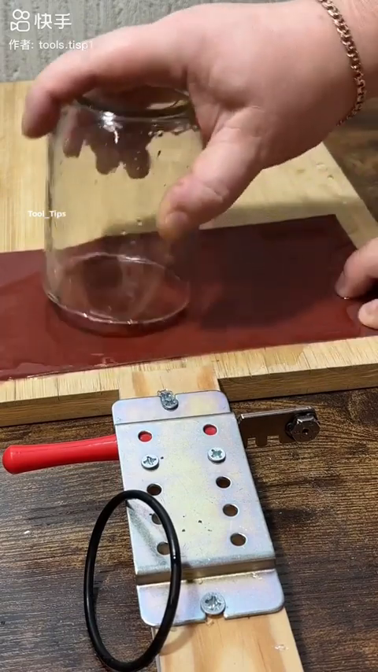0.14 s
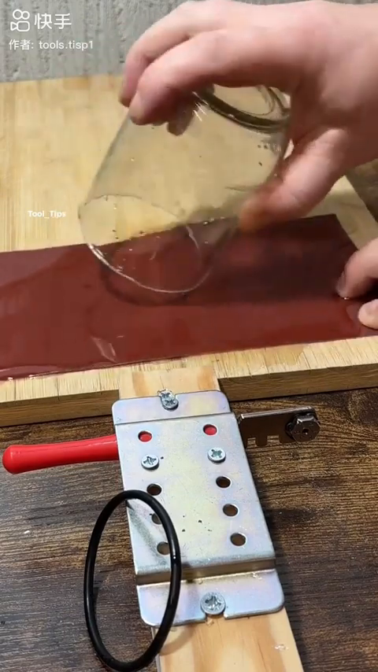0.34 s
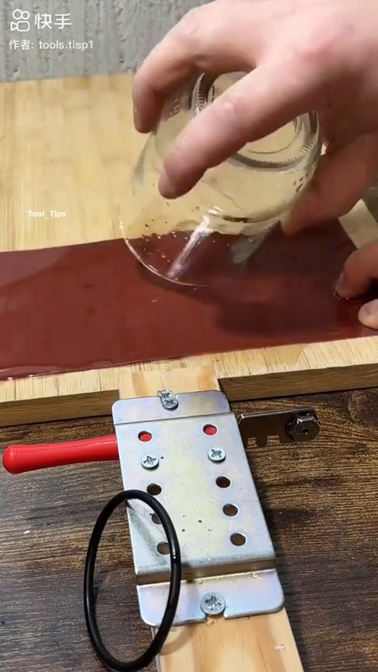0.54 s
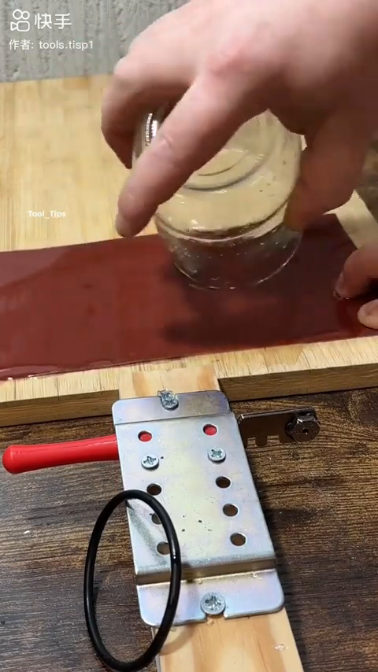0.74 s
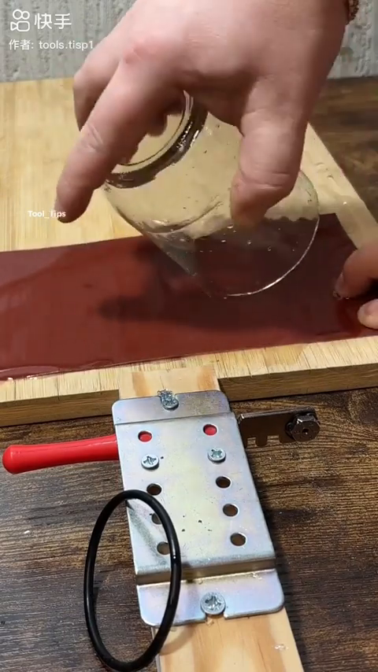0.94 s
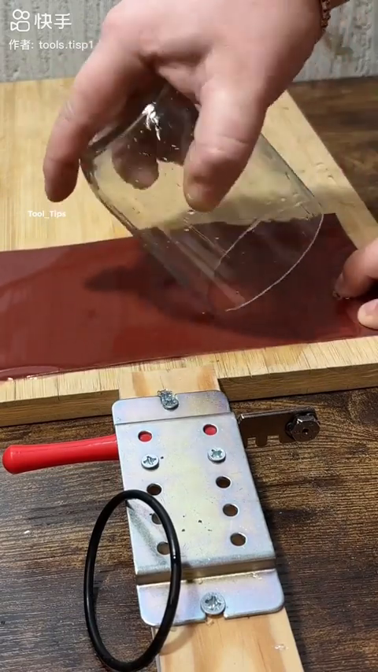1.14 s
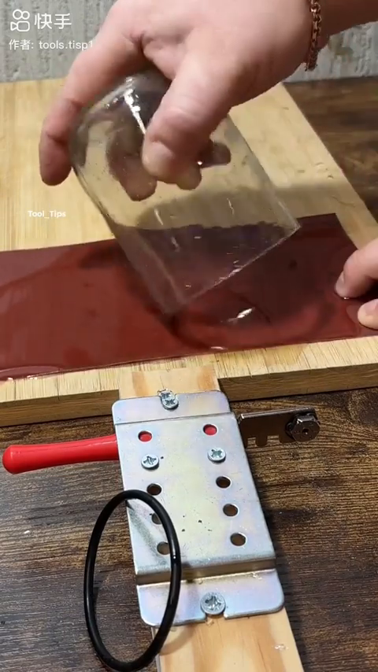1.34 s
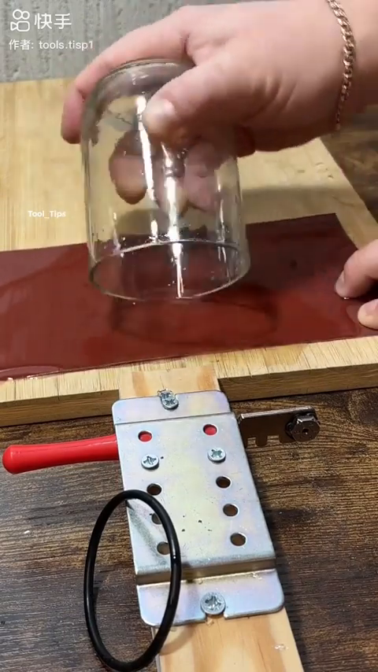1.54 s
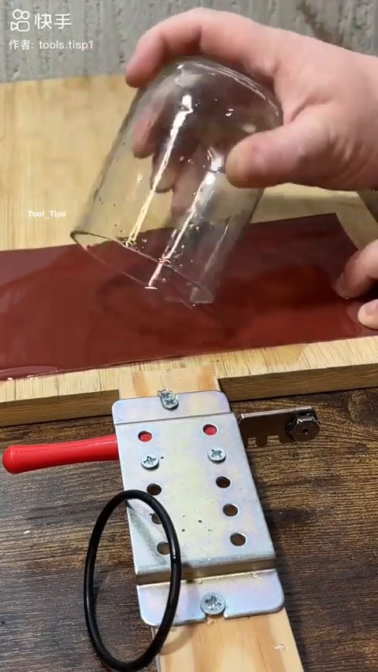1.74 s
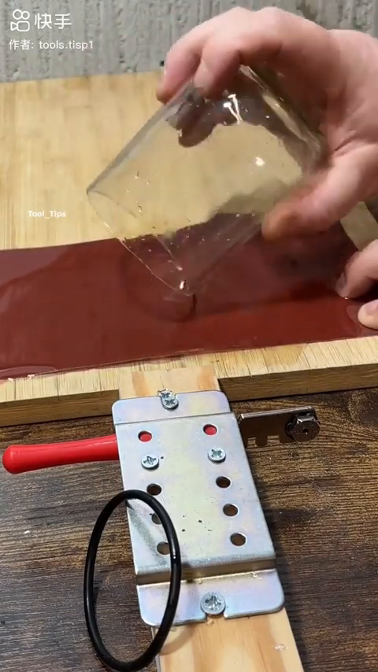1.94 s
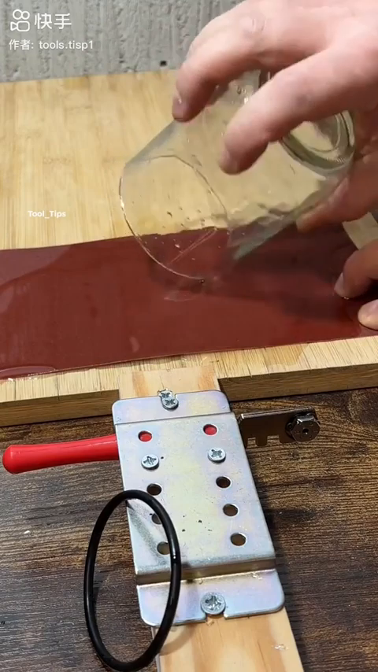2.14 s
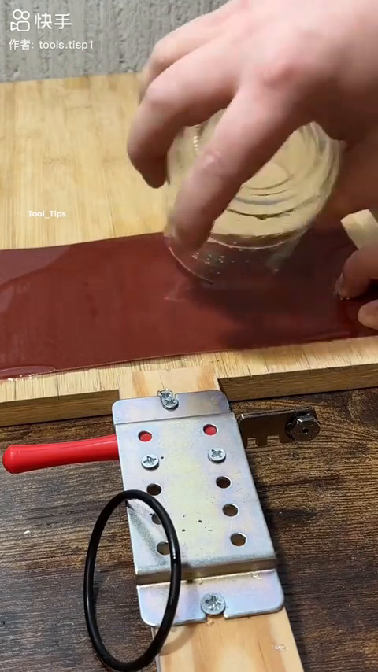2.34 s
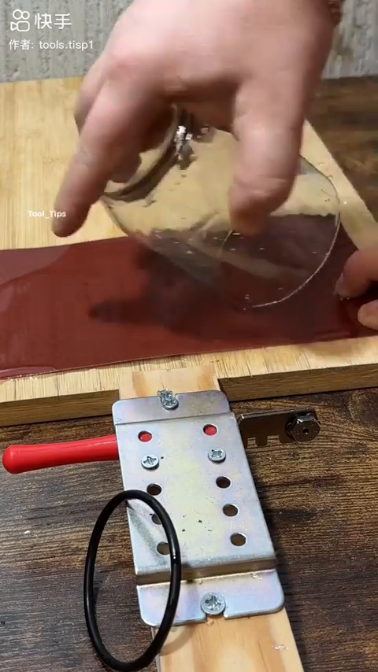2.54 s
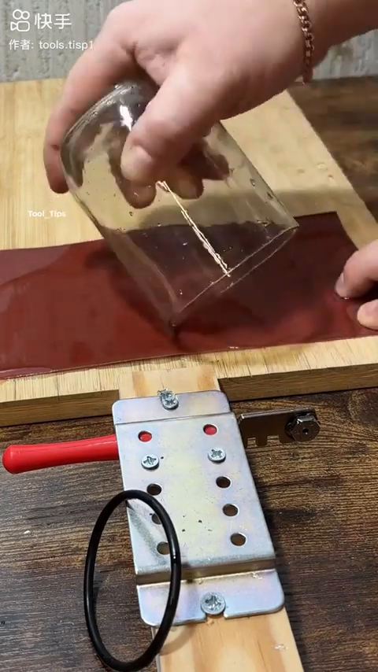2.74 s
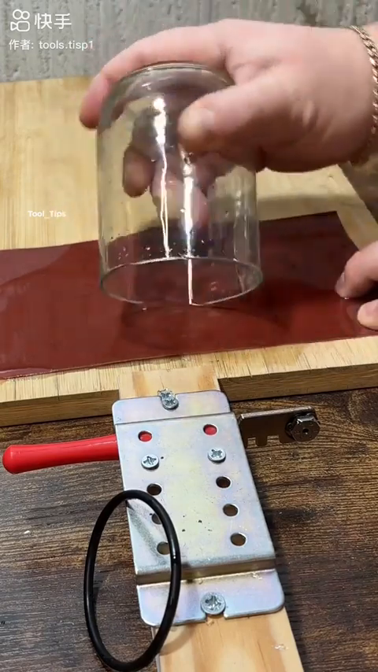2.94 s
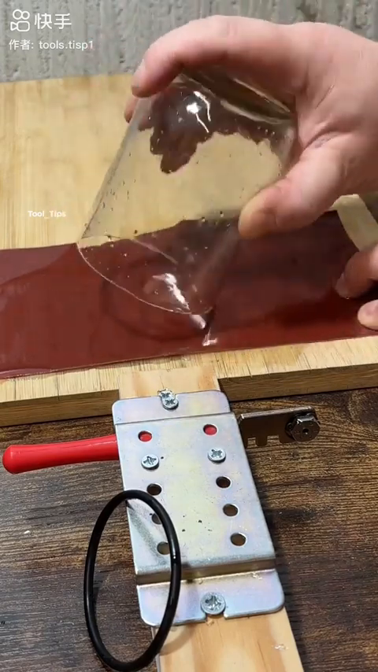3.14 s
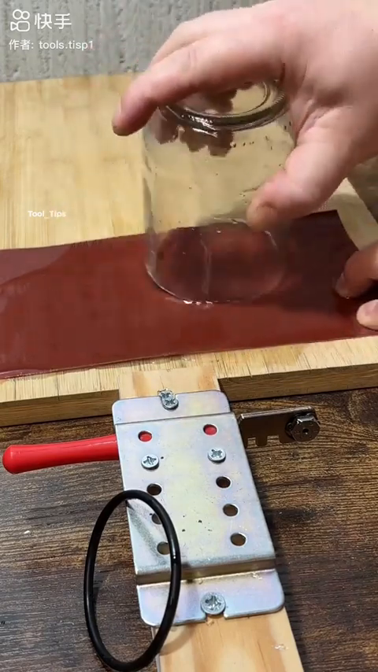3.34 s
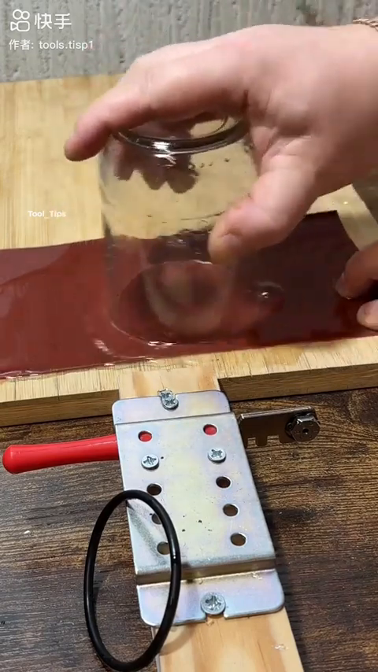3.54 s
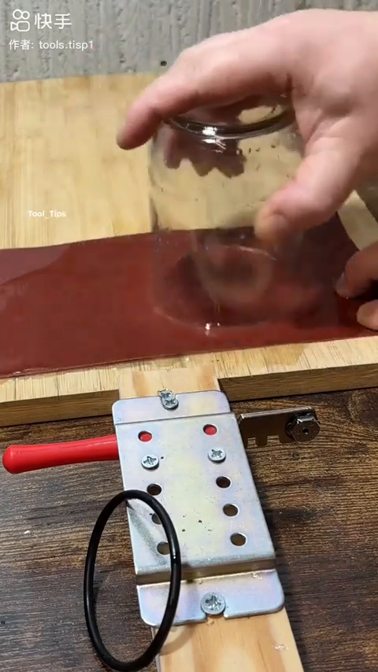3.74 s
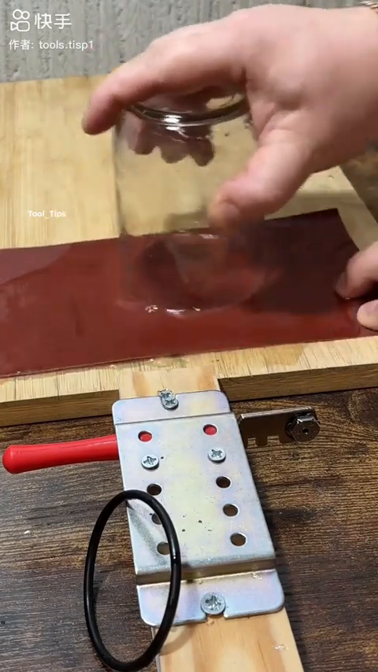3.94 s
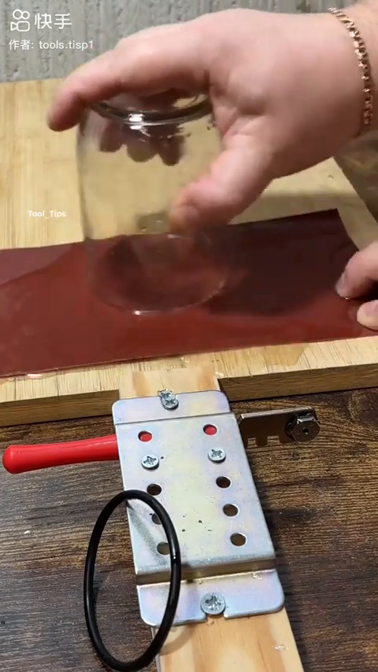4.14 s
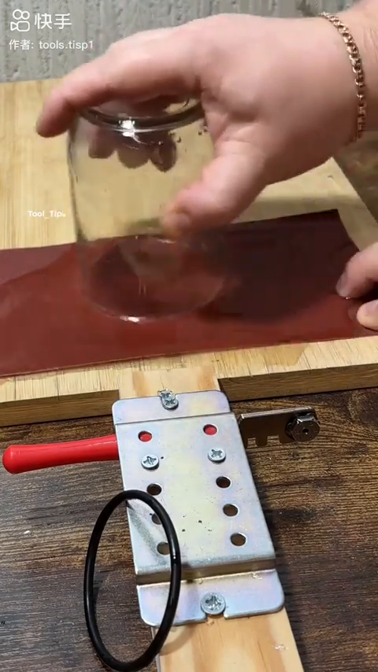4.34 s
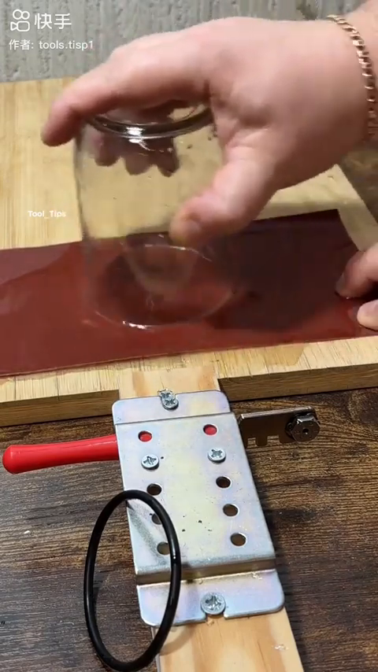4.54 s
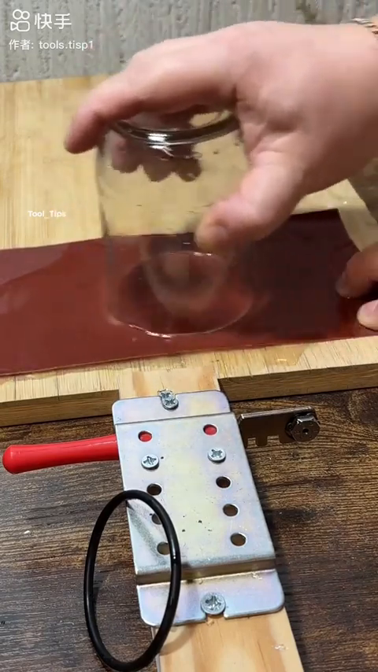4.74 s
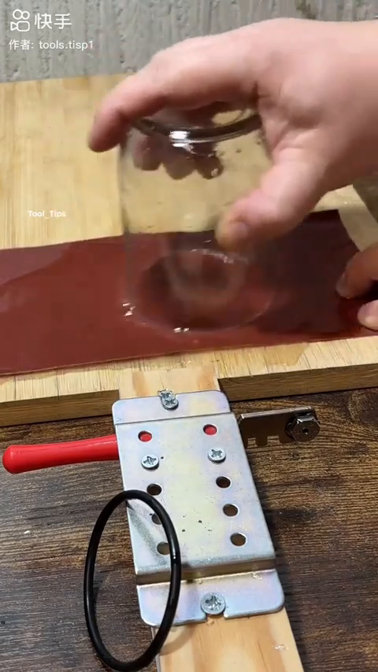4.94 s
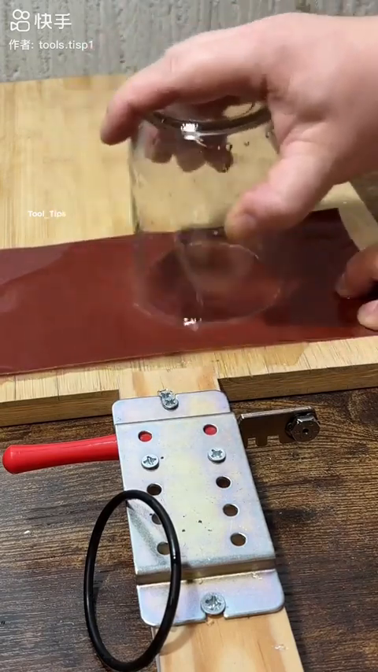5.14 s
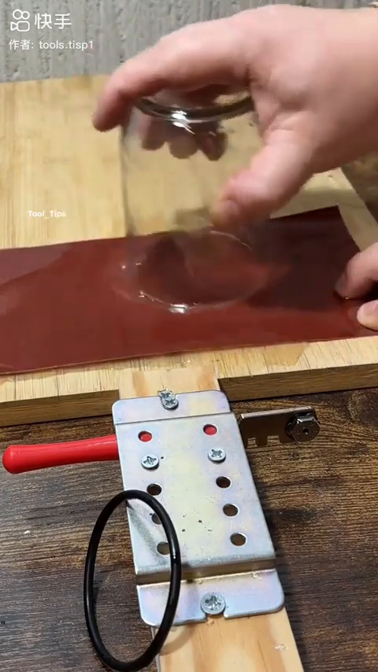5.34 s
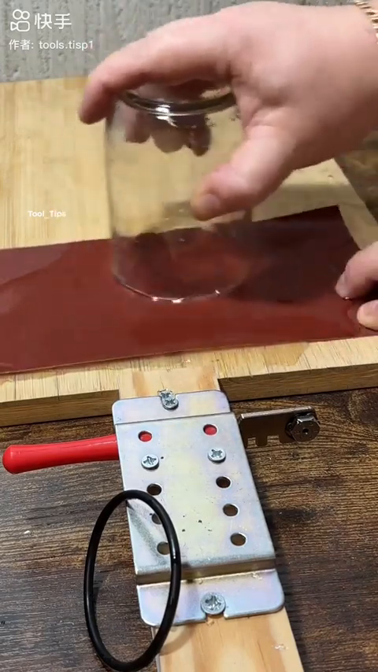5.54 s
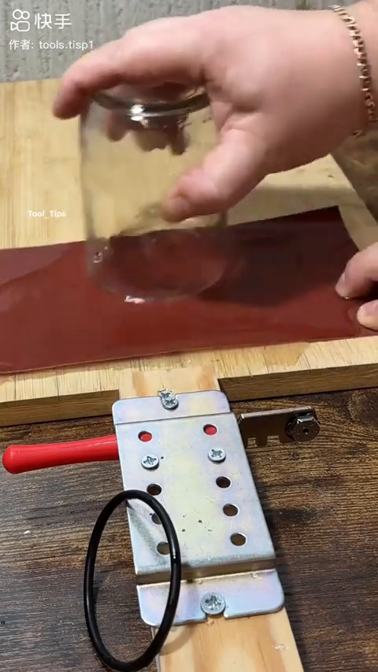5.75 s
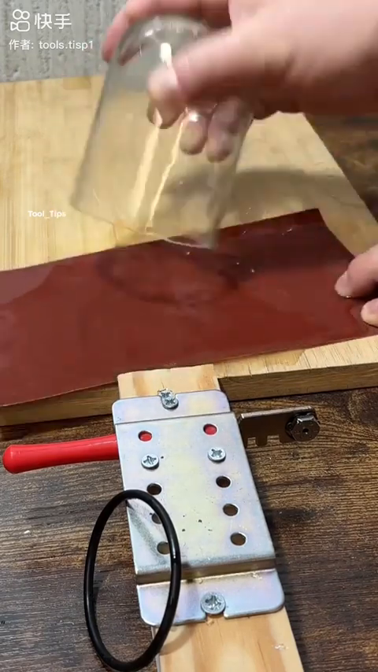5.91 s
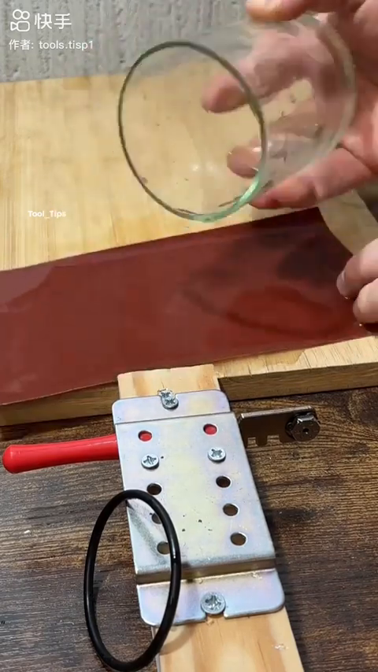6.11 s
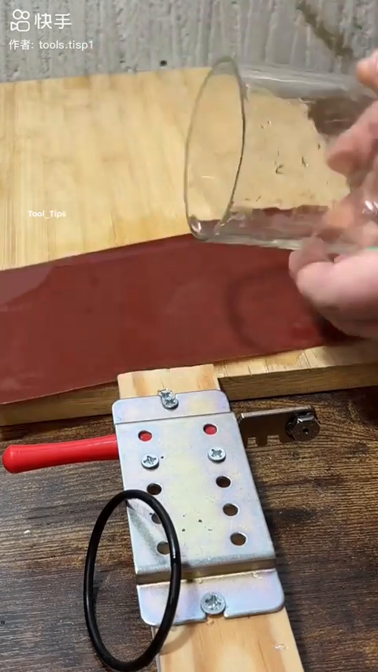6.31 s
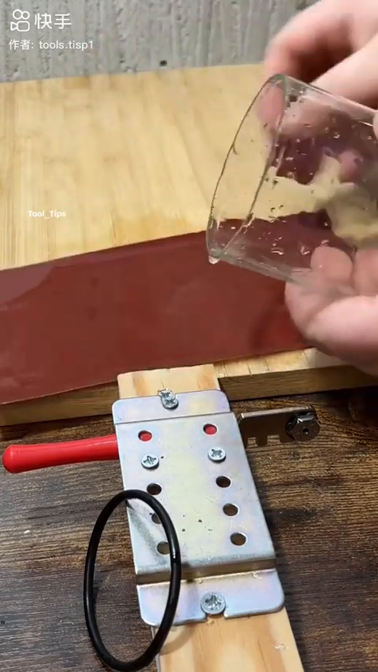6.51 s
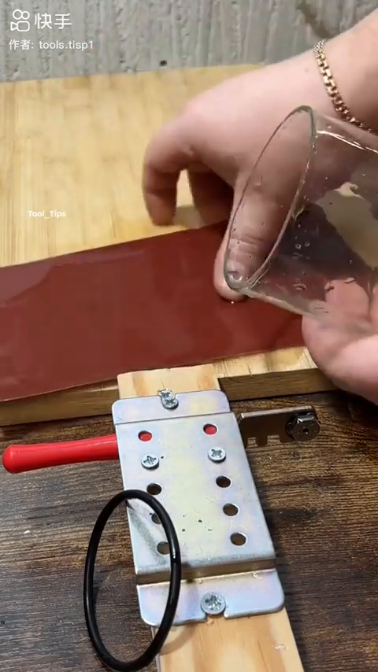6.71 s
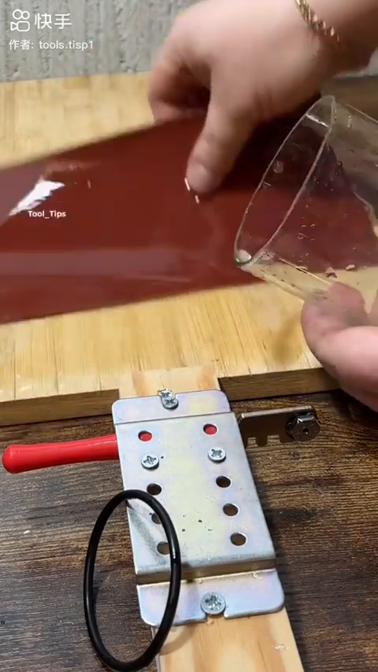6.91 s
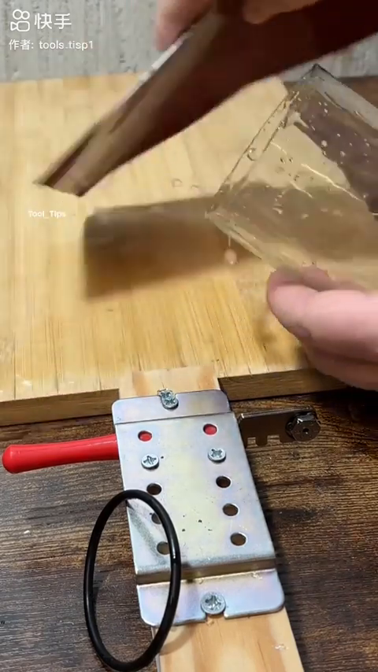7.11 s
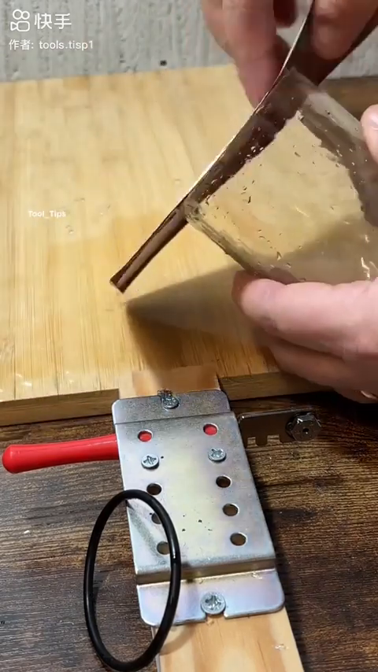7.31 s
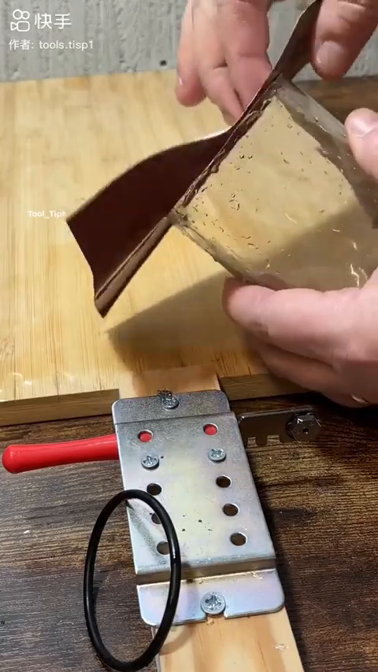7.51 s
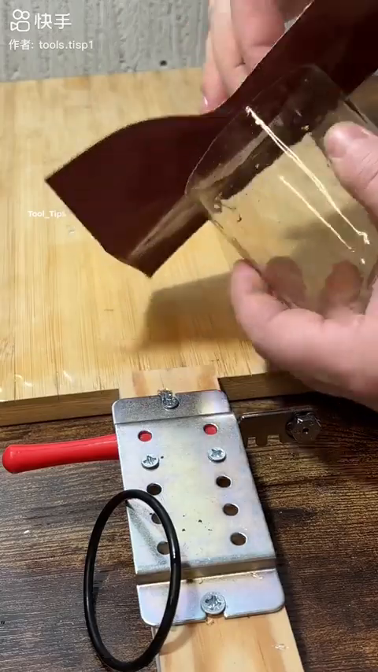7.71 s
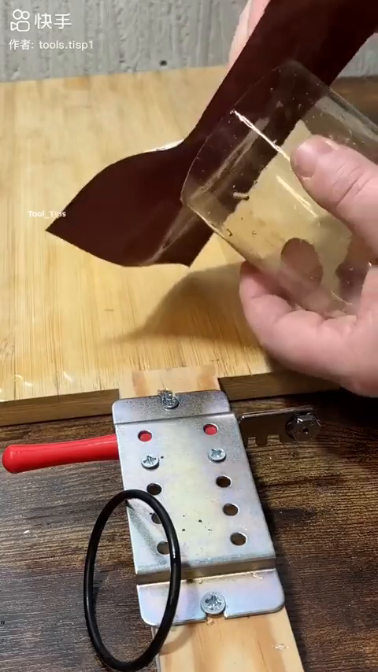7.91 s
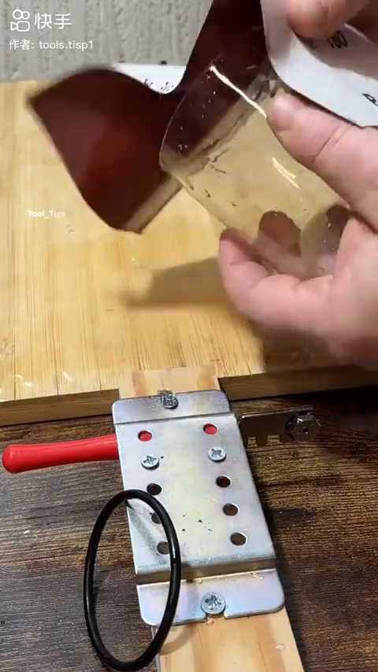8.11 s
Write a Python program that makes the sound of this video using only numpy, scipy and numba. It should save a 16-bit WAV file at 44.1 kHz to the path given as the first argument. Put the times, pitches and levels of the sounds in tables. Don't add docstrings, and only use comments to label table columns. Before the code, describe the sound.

Close phone pickup in a small, quiet room with faint background hush. From 0 to about 3.2 seconds a glass jar's tilted rim rolls over wet sandpaper on a wooden board: coarse, bright gritty hiss in choppy strokes, with tiny stops and sudden bites, a glassy ring shifting in strength and pitch, hollow jar air and low board rumble. From 3.2 to 5.8 the rim lies flat and circles rapidly, about four turns a second, in a steadier grinding hiss with a high ring, brief squeals, strongest near 4.5 and 5.4, and dull knocks. Around 5.8 the wet seal pops and grinding stops. Near silence follows until about 6.6, then faint sheet sliding and light taps. From 7.2 the loose sheet meets the rim in uneven, papery rasps and snaps, strong around 7.6, ending after 8.0 with a longer rub that catches in a rapid, loud stutter near 8.2.

```python
import sys
import numpy as np
from scipy import signal
from scipy.fft import rfft, irfft
from scipy.io import wavfile
from scipy.ndimage import uniform_filter1d
from numba import njit

SR = 44100
rng = np.random.default_rng(int(sys.argv[2]) if len(sys.argv) > 2 else 0)


def volts(x):
    e = np.asarray(x, float) / 20
    return 10 ** e


def unload_wav(signal):
    wavfile.write(
        sys.argv[1],
        SR,
        np.round(np.clip(np.atleast_2d(signal).T, -1, 1) * 32767).astype(np.int16),
    )


N = 364707
T = np.arange(N) / SR
FLAT_S, OFF_S, LIFT_S, PINCH_S, LAST_RUB_S = 3.2, 5.9, 7.1, 7.42, 8.04


def curves(table):
    s, *columns = np.transpose(table)
    return [np.interp(T, s, c) for c in columns]


def around(s):
    span = slice(max(int(s * SR) - SR // 4, 0), int(s * SR) + SR // 4)
    return span, T[span] - s


def unit(x):
    return x / np.sqrt(np.mean(x ** 2))


def colour(x, points):
    hz, db = np.transpose(points)
    log_hz = np.log(np.arange(N // 2 + 1) * SR / N + 1)
    return irfft(rfft(x) * volts(np.interp(log_hz, np.log(hz), db)), N)


@njit
def svf(x, g, k):
    y, band, low = np.empty(len(x)), 0., 0.
    for i in range(len(x)):
        v = (band + g[i] * (x[i] - low)) / (1 + g[i] * (g[i] + k[i]))
        band = 2 * v - band
        low = low + 2 * g[i] * v
        y[i] = k[i] * v
    return y


def ring(x, hz, width_hz):
    hz = hz + np.zeros(N)
    return svf(x + 1e-18, np.tan(np.pi * hz / SR), width_hz / hz) / np.sqrt(np.pi * width_hz / SR)


def body(x, modes, rise=0, damping=1, patchy_db=0):
    out = np.zeros(N)
    for k, (hz, width_hz, db) in enumerate(modes):
        gain = (-1) ** k * volts(db + patchy_db * walk(5))
        out += gain * ring(x, hz * (1 + rise), width_hz * damping)
    return out


def walk(rate_hz):
    hold = max(int(SR / rate_hz), 1)
    steps = np.repeat(rng.standard_normal(N // hold + 1), hold)
    return unit(uniform_filter1d(steps, hold)[:N])


def grains(scatter_db, flutter_db, rate_hz):
    size = np.minimum(rng.exponential(size=N), 5)
    clump = np.clip(walk(rate_hz), -2, 2)
    return unit(rng.standard_normal(N) * volts(scatter_db * size + flutter_db * clump))


def rubbing():
    # (time [s], grit hiss level [dB])
    pressure = [(0, -48), (.12, -39.5), (.27, -39), (.5, -45), (.85, -48.5), (.97, -39.5), (1.2, -41.5),
                (1.55, -38), (1.7, -36), (2.2, -40.5), (2.55, -39.5), (2.8, -34.5), (3.1, -38),
                (3.5, -38.5), (4.4, -37), (5.79, -37), (5.87, -50), (5.91, -111)]
    # (time [s], grit hiss level [dB])
    handling = [(6.198, -95), (6.55, -99), (6.63, -75.5), (6.88, -70), (6.97, -67.5), (7.03, -82.5),
                (7.16, -84), (7.18, -40.5), (7.25, -52.5), (7.348, -57.5), (7.388, -37), (7.64, -32.5),
                (7.7, -41), (7.79, -58), (7.85, -45.5), (8.02, -43.5), (8.11, -39), (8.27, -57.5)]
    # (time [s], pitch rise [%])
    grip = [(0, 1.2), (.45, 1.6), (.62, 5), (1.0, 1.5), (1.5, 4), (2.0, 4.5), (2.35, 9), (2.7, 4),
            (3.05, 1.6), (3.5, .5), (5.7, .3), (5.9, .9), (6.5, 2), (7.2, 2.2), (7.95, 2.5), (8.06, 1.2)]
    swing_db, low_db, high_db, sheet_db, board_db = shares()
    hiss_db = curves(pressure + handling)[0] + swing_db
    force = friction(hiss_db)
    rise_pct, = curves(grip)
    bite_pct = np.minimum(rise_pct, 4.5)
    damping = 0.62 + 0.52 * rise_pct
    out = grit_hiss(force, hiss_db) + sheet_scrape(force, sheet_db, bite_pct)
    out += wall_rings(force, low_db, high_db, rise_pct, damping) + jar_air(force, damping)
    return out + board_rumble(force, hiss_db, board_db, bite_pct)


def friction(hiss_db):
    # (time of new bite [s], lull length [s], depth [dB])
    halts = [(0.067, 0.042, 9.5), (0.134, 0.028, 25), (0.199, 0.024, 18), (0.701, 0.025, 12.5),
             (0.774, 0.035, 11.5), (0.847, 0.044, 18), (0.934, 0.047, 37), (1.031, 0.045, 24),
             (1.138, 0.068, 25), (1.2, 0.028, 19), (1.27, 0.028, 21), (1.328, 0.018, 23),
             (1.385, 0.014, 13), (1.455, 0.02, 23), (1.522, 0.032, 16), (1.582, 0.033, 10),
             (1.647, 0.036, 16.5), (1.723, 0.021, 16), (2.345, 0.038, 7), (2.381, 0.014, 12.5),
             (2.455, 0.017, 18), (2.536, 0.046, 17), (2.589, 0.043, 22), (2.632, 0.034, 6.5),
             (2.684, 0.024, 16), (2.748, 0.023, 20), (2.81, 0.027, 22), (2.868, 0.022, 15),
             (2.931, 0.041, 10), (3.321, 0.086, 3)]
    # (time of new contact [s], lull length [s], depth [dB])
    slips = [(5.844, 0.036, 23.5), (6.698, 0.02, 12), (6.947, 0.064, 10), (7.221, 0.043, 10),
             (7.269, 0.012, 14.5), (7.361, 0.019, 25), (7.476, 0.08, 21), (7.523, 0.028, 7.5),
             (7.612, 0.057, 17), (7.722, 0.082, 20.5), (7.824, 0.016, 8.5), (7.892, 0.081, 21),
             (7.924, 0.013, 11), (8.018, 0.077, 12)]
    # (time [s], peak level [dB])
    catches = [(8.0694, -19.5), (8.0844, -22), (8.1085, -29), (8.124, -21), (8.15, -16.5), (8.165, -12),
               (8.1756, -16), (8.186, -13), (8.1954, -24), (8.201, -10.5), (8.2172, -4.5), (8.225, -4.5),
               (8.2385, -6.5)]
    halt_db, jolt = np.zeros(N), np.ones(N)
    for s, length_s, depth_db in halts + slips:
        span, t = around(s)
        coast = 1 + np.tanh((t + length_s) / (0.21 * length_s))
        rebite = 1 - np.tanh(t / (0.0013 + 0.11 * length_s))
        halt_db[span] += depth_db * coast * rebite / 4
    for s, db in catches:
        span, t = around(s)
        ease_s = np.where(t > .001, .004, .0007)
        jolt[span] += volts(db + 19.0) * np.exp(-np.abs(t - .001) / ease_s)
    return volts(hiss_db - halt_db) * jolt


def shares():
    # (mean level [dB], swing per roll [dB], time of strongest [s])
    tilted = [
        (0, -0.5, 0),
        (3.5, 5, 0.63),
        (0.6, 4, 1.02),
        (-1.5, 3, 1.525),
        (-5, 1, 0.92),
    ]
    # (mean level [dB], swing per turn [dB], lag [turns])
    flat = [
        (-0.5, 1.2, 0.014),
        (-1.5, 1, -0.041),
        (1, 3, -0.036),
        (1, 0.5, 0.056),
        (-11, 0.5, 0.04),
    ]
    # (sliding [dB], meeting the free rim [dB], pinched on [dB], last long rub [dB])
    in_hand = [
        (4, 0.5, 2.5, 2.5),
        (-8, -3.5, -18, -8),
        (-17.5, -4.5, -28, -15),
        (3.5, -5, -8.5, 10),
        (-3, -15.5, -33, -40),
    ]
    roll_s, turn_s, turn_at_s, seal_s = 1.58, .226, 4.48, 3.42

    def after(s, ease_s):
        return (1 + np.tanh((T - s) / ease_s)) / 2

    off, last_rub = after(OFF_S, 0.014), after(LAST_RUB_S, .02)
    settled = [after(FLAT_S, 0.099)] * 4 + [after(seal_s, .04)]
    out = []
    for tilt_row, flat_row, hand_row, flatness in zip(tilted, flat, in_hand, settled):
        db, swing_db, s = tilt_row
        flat_db, turn_db, lag = flat_row
        slide_db, meet_db, pinch_db, last_db = hand_row
        rolling = db + swing_db * np.cos(2 * np.pi * (T - s) / roll_s)
        circling = flat_db + turn_db * np.cos(2 * np.pi * ((T - turn_at_s) / turn_s - lag))
        on_board = rolling + flatness * (circling - rolling)
        pinched = pinch_db + last_rub * (last_db - pinch_db)
        held = np.select([T < LIFT_S, T < PINCH_S], [slide_db, meet_db], pinched)
        out.append((1 - off) * on_board + off * held)
    return out


def grit_hiss(force, hiss_db):
    # (frequency [Hz], level per Hz [dB])
    grit = [(120, -42), (300, -11), (620, -5), (1300, 3), (2500, 2), (4700, -1), (6200, -0.5), (6700, -6.5),
            (8400, -8), (8800, -7.5), (10000, 0), (13000, 1), (15000, 1.5), (16500, 0.5)]
    # (frequency [Hz], width [Hz], level [dB])
    shimmer_modes = [(8780, 360, -0.5), (9460, 320, 1)]
    hiss = 1.26 * force * unit(colour(grains(1.7, 1.71, 120), grit))
    flare = volts(-9 + 0.37 * (hiss_db + 39.5))
    return hiss + body(force * (T < OFF_S) * flare * grains(1.5, 4.1, 35), shimmer_modes)


def sheet_scrape(force, sheet_db, bite_pct):
    # (frequency [Hz], width [Hz], level [dB])
    backed_modes = [(2255, 780, -16.5), (3026, 170, -4), (3374, 290, 0), (3890, 120, -9), (4360, 140, -6.5),
                    (6020, 220, -12.5)]
    # (frequency [Hz], width [Hz], level [dB])
    loose_modes = [(2360, 700, -4.5), (3460, 1000, 4.5), (4500, 1200, 3.5), (5940, 400, -4.5),
                   (8350, 2400, -3)]
    swell_db = 6 * np.exp(-((T - 6.81) / 0.069) ** 2)
    sheet_db = sheet_db + 0.95 * bite_pct + swell_db
    scrape = force * volts(sheet_db - 6.5) * grains(1.5, 2.2, 90)
    backed = body(scrape * (T < OFF_S), backed_modes, 0.013 * walk(6), patchy_db=1.1)
    loose = body(scrape * (T >= OFF_S), loose_modes)
    lifted = ring(force * (T >= LIFT_S) * volts(-10.0) * grains(1.5, 1.5, 100), 8400.0, 1800.)
    return backed + loose + lifted


def wall_rings(force, low_db, high_db, rise_pct, damping):
    # (frequency [Hz], width [Hz], level [dB])
    low_modes = [(1922.4, 42, 0), (2075, 380, -21)]
    # (frequency [Hz], width [Hz], level [dB])
    high_modes = [(5122, 33, 0), (5248, 160, -1), (11230, 95, -13.5)]
    low_push = force * volts(low_db - 1.5 - 1.18 * rise_pct) * grains(1.9, 2.97, 22)
    high_push = force * volts(high_db - 2.5) * grains(1.5, 0.88, 60)
    low = body(low_push, low_modes, rise_pct / 100, damping)
    return low + body(high_push, high_modes, 0.24 * rise_pct / 100, np.where(T > 8, 5, damping))


def jar_air(force, damping):
    # (time [s], frequency [Hz], level re hiss [dB])
    cavity = [(.055, 610, -2.5), (.07, 705, 4), (.11, 860, 3), (.17, 973, -6), (.6, 1014, -2.5),
              (1.2, 1010, -12), (1.4, 1114, -4), (2.4, 1000, -10.5), (2.9, 1114, -13), (3.05, 985, -7),
              (3.25, 870, 2), (3.35, 764, -3), (3.4, 740, -24), (5.8, 700, -17.5), (5.85, 723, 9.5),
              (5.9, 796, -12)]
    # (time [s], frequency [Hz], level re hiss [dB])
    slide_air = [(6.7, 1470, -15), (6.8, 1460, -5), (7.04, 1530, 7), (7.1, 1490, -12)]
    # (time [s], frequency [Hz], level re hiss [dB])
    covered_air = [(7.18, 683, -10), (7.24, 630, 9), (7.32, 560, -2), (7.39, 700, 4), (7.48, 550, -2.5),
                   (7.7, 496, -8.5), (7.99, 640, -2.5), (8.12, 800, 4), (8.27, 800, -1.5)]
    air_hz, air_db = curves(cavity + slide_air + covered_air)
    return ring(force * volts(air_db) * grains(2.7, 2.1, 50), air_hz, 20 + 38 * damping)


def board_rumble(force, hiss_db, board_db, bite_pct):
    # (frequency [Hz], width [Hz], level [dB])
    plank = [(145, 49, -14), (233, 46, -7), (363, 68, -3.5), (525, 24, -7.5), (640, 20, -8.5)]
    push = uniform_filter1d(force, size=1500)
    give_db = .4 * (hiss_db + 38.5) * (T < OFF_S)
    gain = volts(board_db - 0.53 * bite_pct - give_db)
    return body(push * gain * grains(2.8, 1.7, 25), plank, patchy_db=0.5)


def squeals():
    # (time [s], rms level [dB], length [s])
    low_squeals = [(3.234, -42, 0.045), (3.29, -35.5, .035), (3.867, -36, .042), (3.998, -34.5, 0.032),
                   (4.098, -31, 0.031), (4.333, -34.5, .028), (4.456, -19, 0.025), (4.501, -31.5, 0.01),
                   (5.144, -31.5, 0.03), (5.372, -15, .023), (5.466, -32.5, 0.022), (5.749, -33, 0.02)]
    # (time [s], rms level [dB], length [s])
    high_squeals = [(2.7, -30.5, 0.019), (3.334, -30.5, 0.01), (3.356, -32, .011), (3.59, -34.5, .015),
                    (3.738, -33, 0.021), (3.753, -34, .009), (3.859, -33.5, 0.029), (4.013, -29, 0.021),
                    (4.032, -36, .008), (4.096, -34, 0.021), (4.214, -31.5, .018), (4.244, -26.5, 0.02),
                    (4.48, -27, 0.019), (4.673, -37, .013), (4.699, -39, 0.0038), (4.93, -25.5, 0.027),
                    (4.956, -35, .007), (5.168, -38, .057), (5.207, -38, .008), (5.343, -39, .008),
                    (5.4, -31, 0.014), (5.606, -30, .023)]
    spread = 0.0033
    out = np.zeros(N)
    drift = 2 * np.pi * np.cumsum(12 * walk(60)) / SR
    for mode_hz, table in ((1914, low_squeals), (5182, high_squeals)):
        for s, db, length_s in table:
            turn, off = rng.random(2)
            span, t = around(s)
            hz = mode_hz * (1 + spread * (2 * off - 1))
            swell = 1.64 * volts(db) * np.exp(-(t / (0.48 * length_s)) ** 2)
            out[span] += swell * np.sin(2 * np.pi * (hz * t + turn) + drift[span])
    return out


def taps():
    # (time [s], peak level [dB], frequency [Hz], t60 [s], snap level [dB])
    knocks = [(4.451, -30, 231, 0.18, -20), (4.584, -26, 222, 0.089, -20), (4.741, -41, 300, 0.089, -3),
              (5.141, -38, 252, 0.19, -8), (6.703, -46, 4500, 0.013, -6), (6.959, -41.5, 1200, 0.11, -23),
              (6.963, -37, 497, 0.073, -25), (7.08, -49, 596, .1, -24), (7.177, -35.5, 505, 0.098, 1),
              (7.449, -37, 3000, 0.022, -8), (7.571, -34.5, 3000, 0.053, 3), (7.772, -30, 2500, 0.037, -3),
              (7.826, -40.5, 2620, 0.1, -12), (7.9, -38, 4400, .04, -16), (7.928, -32, 3000, .04, -10),
              (7.94, -30.5, 646, 0.089, 1.5), (5.846, -37.5, 1900, 0.049, 6), (6.591, -55.5, 160, .4, -26)]
    out = np.zeros(N)
    t = np.arange(SR // 5) / SR
    for s, db, hz, t60_s, snap_db in knocks:
        puff = rng.standard_normal(len(t))
        knock = unit(signal.lfilter(*signal.iirpeak(hz, 1.6, fs=SR), puff)) * volts(-60 * t / t60_s) / 2
        snap = volts(snap_db) * puff * np.exp(-t / 0.0013)
        i = int(s * SR)
        out[i:i + len(t)] += volts(db) * (knock + snap)
    return out


def pops():
    # (time [s], start [Hz], end [Hz], peak level [dB], length [s])
    seals = [
        (0.063, 610, 807, -37, 0.035),
        (5.801, 170, 354, -29, 0.0056),
        (5.848, 640, 865, -35.5, 0.0081),
        (7.477, 490, 570, -35, 0.025),
    ]
    out = np.zeros(N)
    for s, hz, end_hz, db, length_s in seals:
        span, t = around(s)
        u = np.clip(t / length_s, 0, 4)
        pitch_hz = end_hz + (hz - end_hz) * np.exp(-1.5 * u)
        swell = 2 * np.sqrt(u) * np.exp(-u ** 2)
        out[span] += volts(db) * swell * np.sin(2 * np.pi * np.cumsum(pitch_hz) / SR)
    return out


def bench_hum():
    # (time [s], level [dB], length [s])
    leans = [
        (.55, -61, 0.13),
        (1.35, -71, 0.14),
        (2.2, -64, 0.13),
        (3.85, -67.5, 0.6),
        (4.6, -51.5, 0.11),
        (5.4, -57, 0.22),
        (5.9, -65, 0.13),
    ]
    lean = np.full(N, volts(-76.5))
    for s, db, length_s in leans:
        lean += volts(db) * np.exp(-((T - s) / length_s) ** 2)
    return ring(lean * grains(1.5, 3.0, 13), 79, 10)


def room_echo(near):
    t60_s, echo_db = 0.23, -11
    t = np.arange(SR // 2) / SR
    tail = rng.standard_normal(len(t)) * volts(-60 * t / t60_s) * (t > .004)
    return volts(echo_db) * signal.fftconvolve(near, tail / np.sqrt(np.sum(tail ** 2)))[:N]


def room_hush():
    # (frequency [Hz], level per Hz [dB])
    room = [(12, -20.5), (20, 5.5), (53, -13), (81, -16.5), (104, -10.5), (410, -18.5), (607, -17.5),
            (1290, -24), (14700, -33), (16000, -35)]
    return volts(-69 + 1.0 * walk(2.3)) * unit(colour(rng.standard_normal(N), room))


def scene():
    near = rubbing() + taps() + pops() + bench_hum()
    return (near + squeals() + room_echo(near) + room_hush())[None]


def roll_off(x):
    return signal.sosfilt(signal.butter(12, 16790, fs=SR, output="sos"), x)


def record(dry):
    top_hz = 15480
    low_pass = signal.ellip(12, .3, 75, top_hz, fs=SR, output="sos")
    mix = signal.sosfilt(low_pass, dry)
    return roll_off(mix)


dry = scene()
out = record(dry)
unload_wav(out)
```